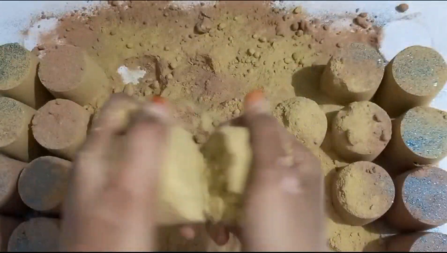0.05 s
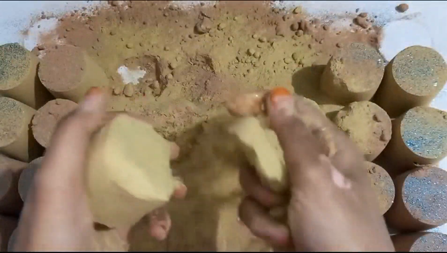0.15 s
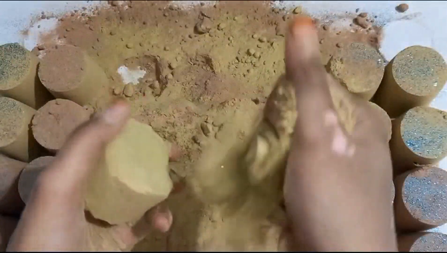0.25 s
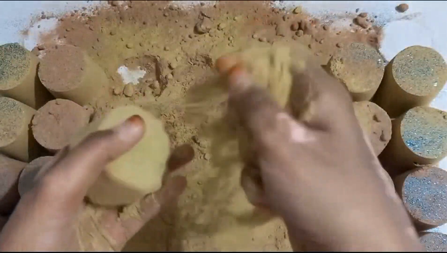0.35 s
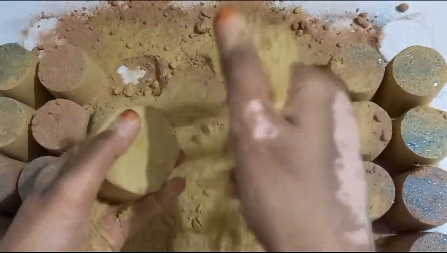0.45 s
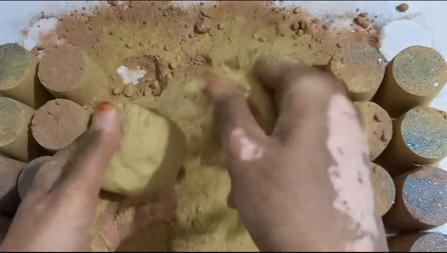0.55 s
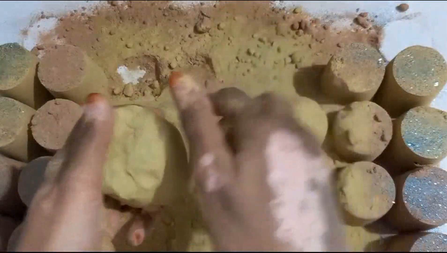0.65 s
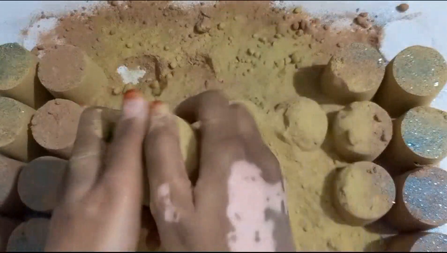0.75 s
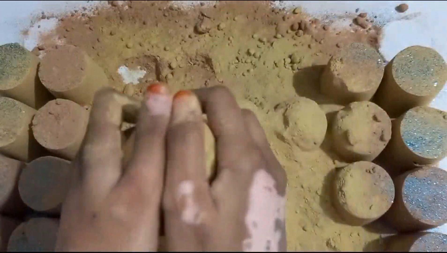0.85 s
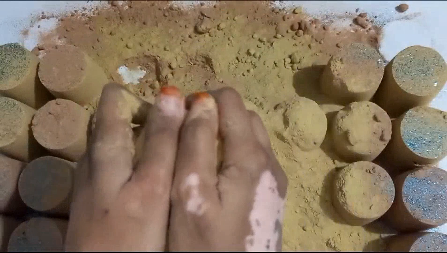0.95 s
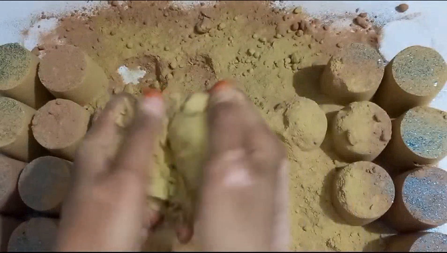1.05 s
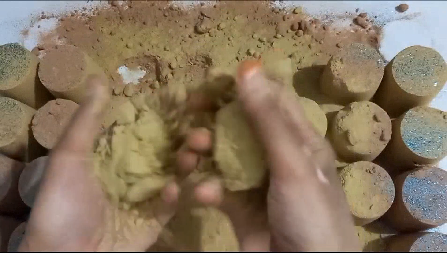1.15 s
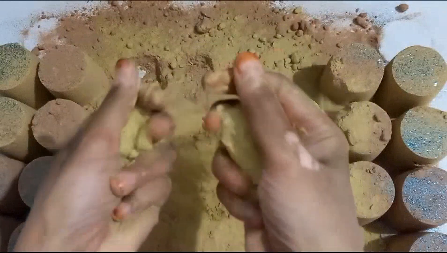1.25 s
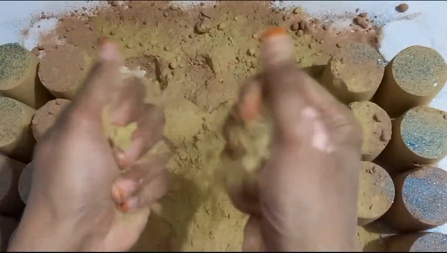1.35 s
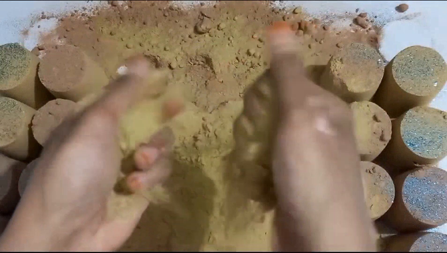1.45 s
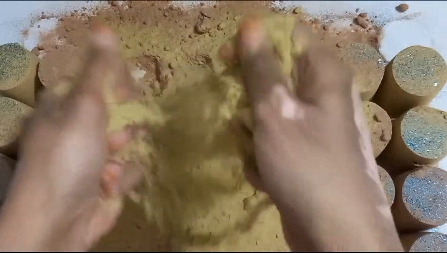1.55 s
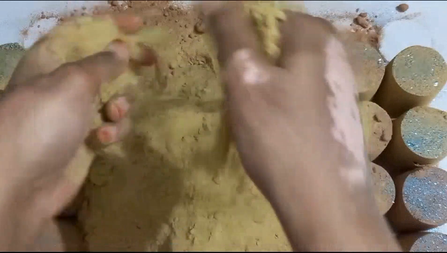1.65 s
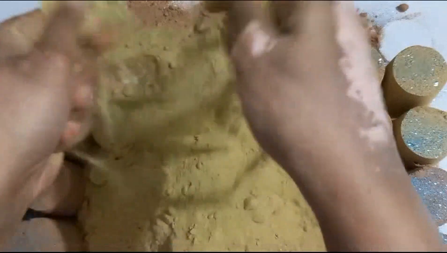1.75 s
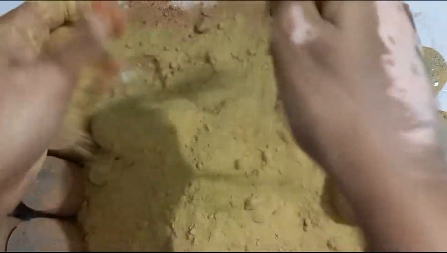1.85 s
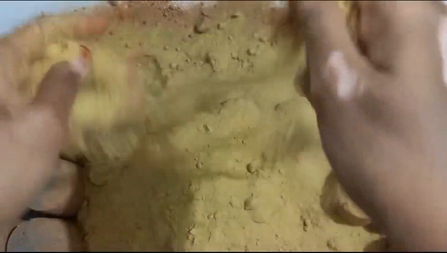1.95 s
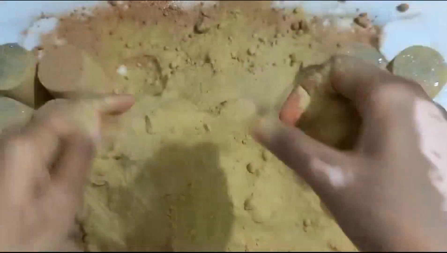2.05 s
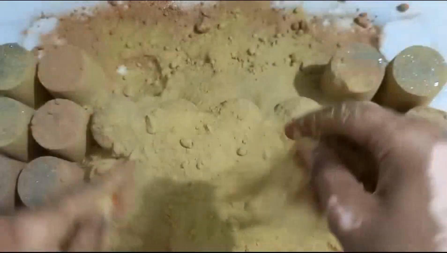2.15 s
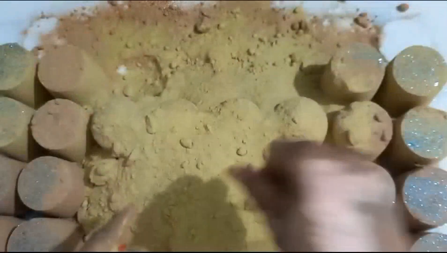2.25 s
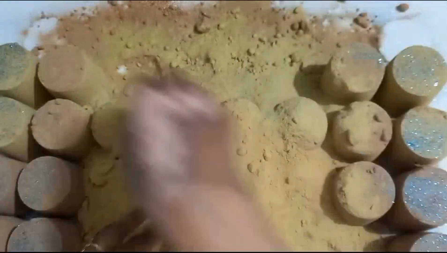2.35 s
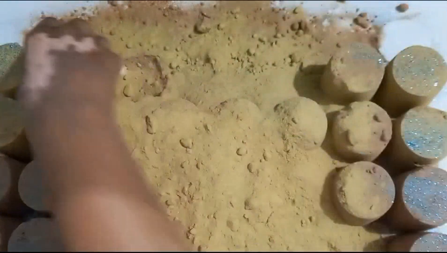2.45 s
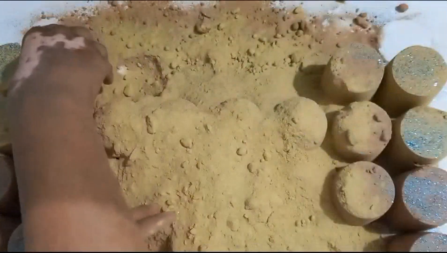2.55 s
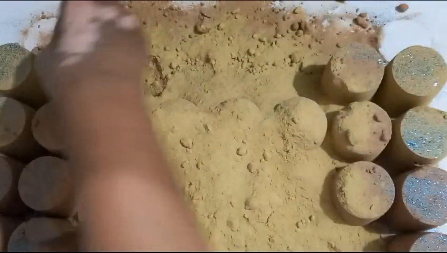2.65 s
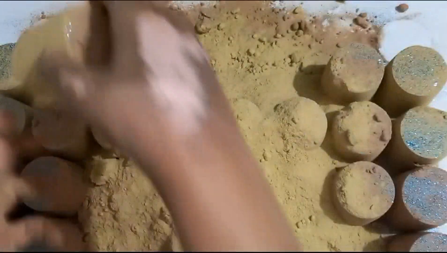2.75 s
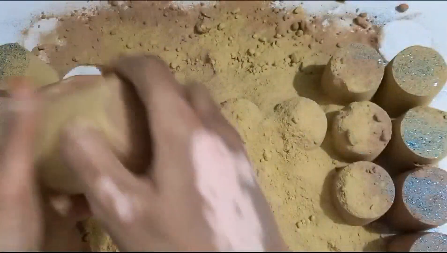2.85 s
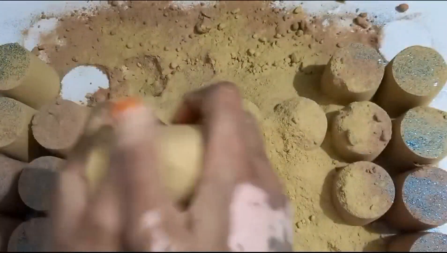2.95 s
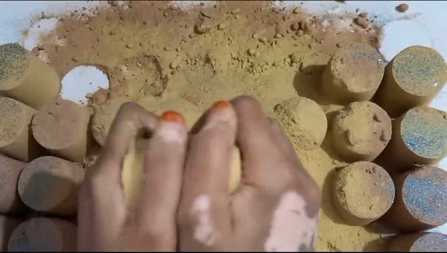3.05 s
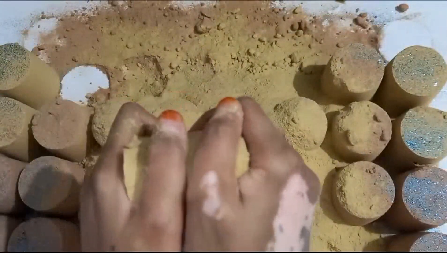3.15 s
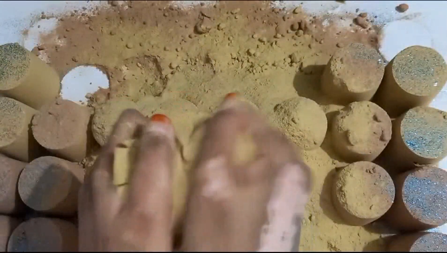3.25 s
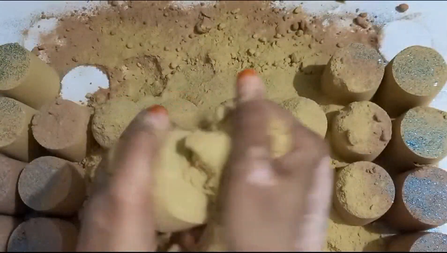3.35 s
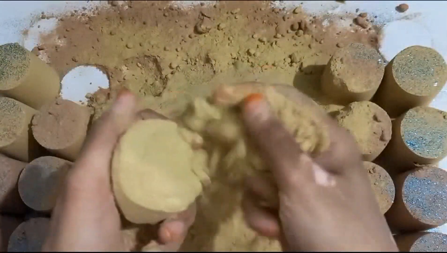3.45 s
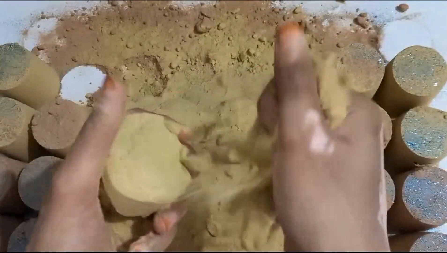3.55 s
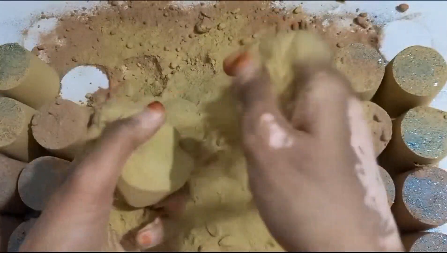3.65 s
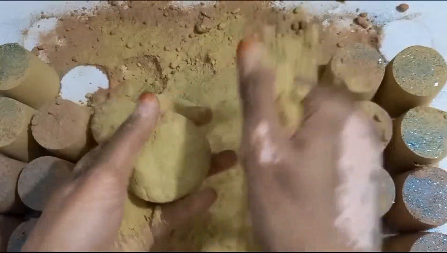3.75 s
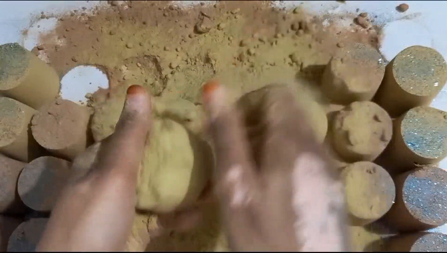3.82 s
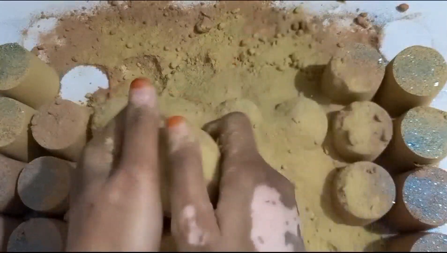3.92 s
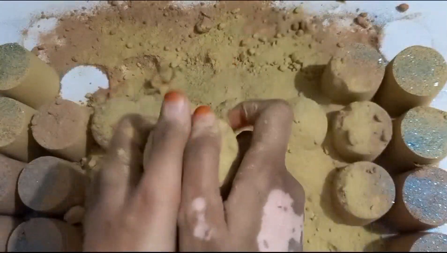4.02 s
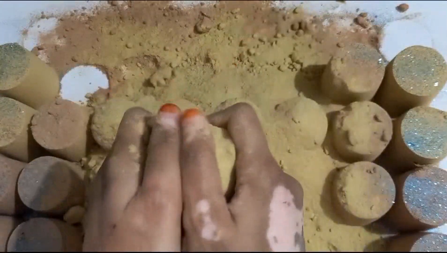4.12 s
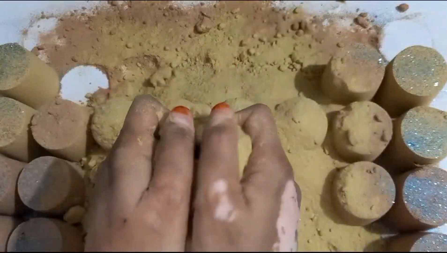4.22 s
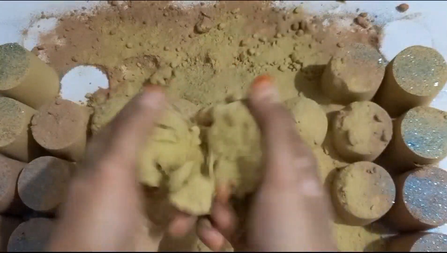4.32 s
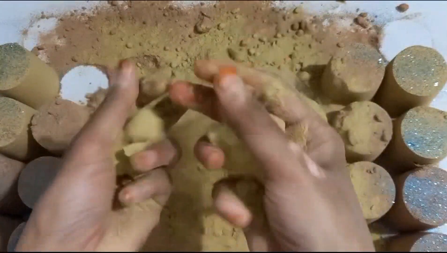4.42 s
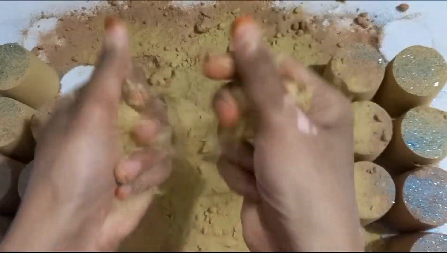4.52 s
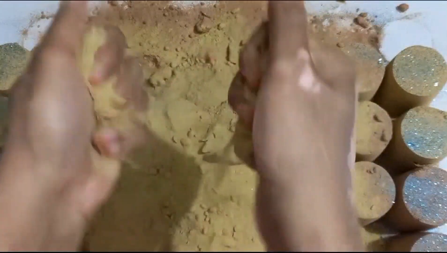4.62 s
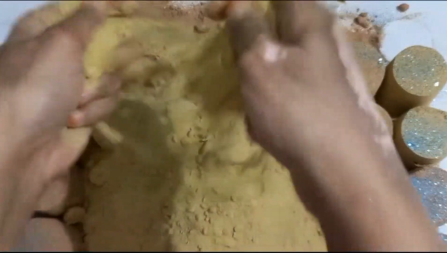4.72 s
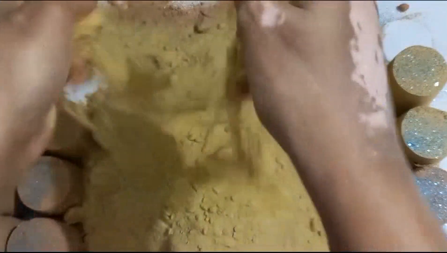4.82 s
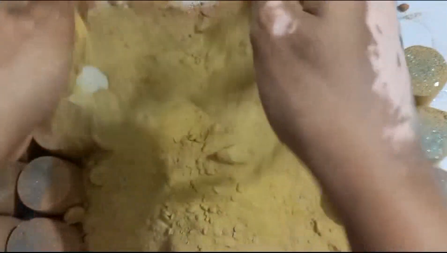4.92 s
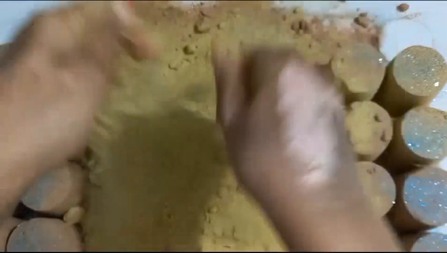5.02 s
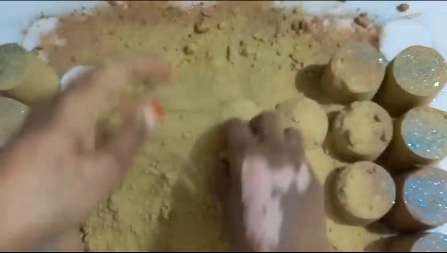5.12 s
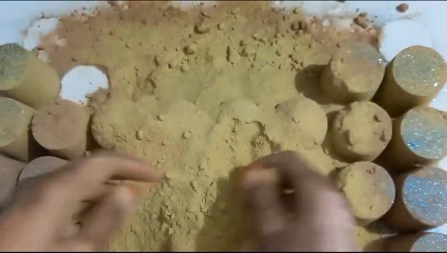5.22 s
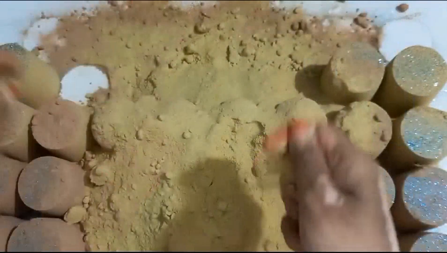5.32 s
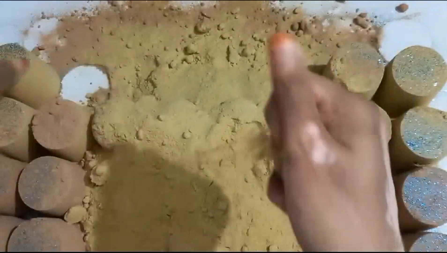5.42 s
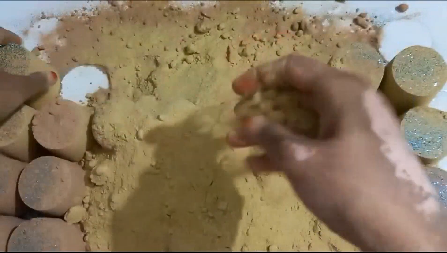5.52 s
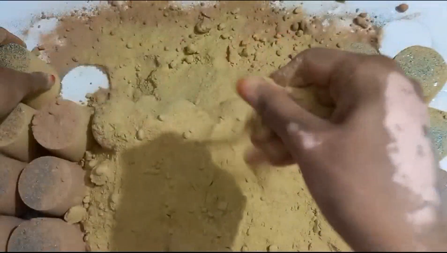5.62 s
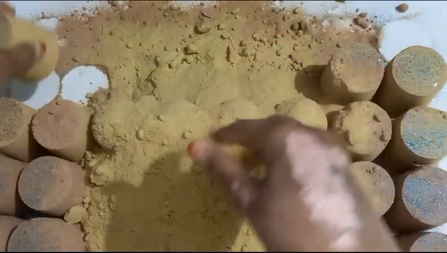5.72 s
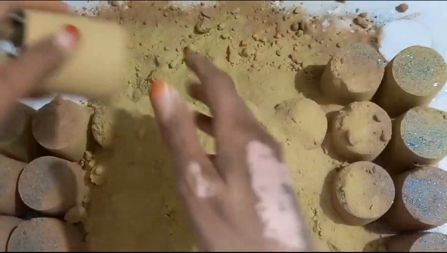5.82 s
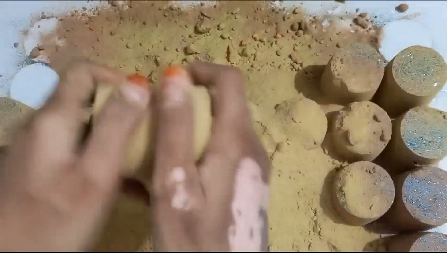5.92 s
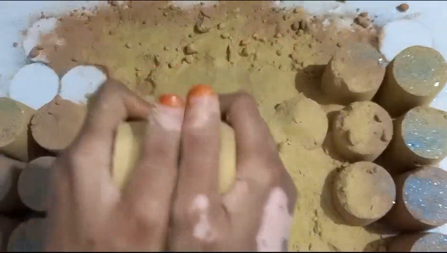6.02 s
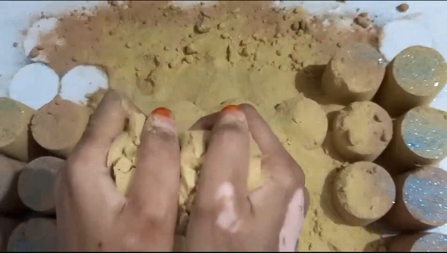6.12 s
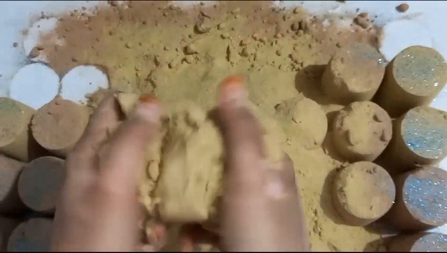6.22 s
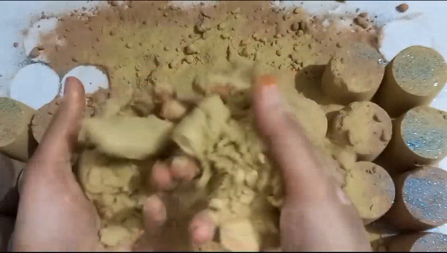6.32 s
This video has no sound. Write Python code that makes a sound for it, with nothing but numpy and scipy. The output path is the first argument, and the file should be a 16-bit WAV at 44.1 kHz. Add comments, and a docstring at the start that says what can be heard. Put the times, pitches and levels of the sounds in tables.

```python
"""Snapping and crumbling pressed powder

Two hands close by snap blocks of pressed powder and crumble the halves over a table in a small room.
Each fracture is a short low push and a burst of small cracks, coloured by the table and cupped hands.
Between them shaped noise grains rub and sift through the fingers as a hiss, and falling lumps knock.
A short room tail, a low rumble and a faint even hiss lie behind."""
import sys
import numpy as np
from scipy import signal
from scipy.fft import rfft, irfft, next_fast_len
from scipy.io import wavfile
from scipy.ndimage import map_coordinates

SR = 44100
rng = np.random.default_rng(int(sys.argv[2]) if len(sys.argv) > 2 else 0)


def persist_wave(psi):
    """Save psi, clipped to +-1, as 16-bit WAV."""
    counts = np.round(np.clip(psi, -1, 1) * 32767).astype(np.int16)
    wavfile.write(sys.argv[1], SR, np.atleast_2d(counts).T)


N = 280917

# Fractures and falling lumps: start_s, push_level_db, pitch_hz,
# crumble_re_push_db, crumble_t60_s, grit_re_push_db
BREAKS = [ (0.68, -48, 386, -4, .1, -4.5), (0.9601, -19, 222, -12.5, 0.071, -11),
          (0.9607, -18.5, 690, -18, .14, -14.5), (0.9672, -27.5, 327, 1.5, 0.065, 1),
          (1.002, -16.5, 790, -7, 0.049, -10.5), (1.336, -31, 660, -5.5, 0.17, -10),
          (1.5542, -28.5, 1250, 7, 0.017, -15.5), (1.5683, -18, 1310, -15.5, .08, -16),
          (1.7269, -15, 1110, -2, 0.047, -12), (1.728, -18.5, 620, -1, 0.064, -21),
          (1.8758, -30.5, 920, -1, 0.05, -13), (2.2541, -17, 1050, -2.5, .125, -15),
          (2.258, -20, 2300, -8.5, 0.093, -11.5), (2.286, -30.5, 800, -11, 0.083, -23.5),
          (2.2948, -29, 828, -3, 0.11, -14.5), (2.354, -33.5, 1414, -13, .047, -38.5),
          (3.2441, -10.5, 253, -11, 0.067, -10.5), (3.353, -36.5, 363, -6.5, .09, -15),
          (3.525, -40, 255, -7, 0.044, -23), (3.821, -39, 200, 1.5, 0.077, -5.5),
          (4.1761, -19, 206, -17, 0.13, -30), (4.188, -22, 336, -13, 0.11, -36.5),
          (4.484, -30, 2050, 0, 0.084, -3.5), (4.522, -25, 490, -6, .06, 2),
          (5.056, -44.5, 155, -6.5, 0.2, -20), (6.076, -34, 111, -12.5, .15, -5),
          (6.107, -33.5, 140, -12, 0.045, -7)]
# Resonances of the table and cupped hands: centre_hz, width_hz, relative_db
BODY_MODES = [(233, 30, -16.5), (344, 60, 0.5), (514, 17, -5.5), (722.2, 240, 1), (990, 37, 12),
              (2000, 230, 7), (2630, 110, 4.5)]
# Squeezes and strokes through the powder: hardest_s, tighten_s, relax_s, dust_flow_db, crumb_flow_db
SQUEEZES = [ (.023, 0.035, 0.03, -47, -53.5), (0.2, 0.054, 0.064, -38.5, -43.5),
            (.315, 0.027, .016, -53.5, -63), (0.397, 0.024, .07, -38.5, -46),
            (.565, .021, .044, -39, -54.5), (.756, .02, 0.029, -52, -73), (.836, 0.031, 0.021, -52, -86),
            (.96, 0.014, .02, -44, -50.5), (1.03, 0.025, .03, -51.5, -60.5),
            (1.115, 0.033, .018, -56.5, -68), (1.19, .014, .04, -44.5, -64),
            (1.255, 0.05, 0.12, -41, -45.5), (1.37, 0.071, .03, -35, -39.5),
            (1.455, 0.012, .018, -55, -57.5), (1.578, 0.041, .037, -34.5, -38.5),
            (1.774, 0.064, 0.039, -35.5, -39), (1.856, 0.036, 0.025, -42.5, -50),
            (1.958, 0.043, 0.047, -35.5, -47), (2.142, 0.023, 0.064, -42, -59), (2.19, .03, .06, -42, -50),
            (2.564, .038, .029, -60.5, -69), (2.774, 0.021, .018, -62.5, -87),
            (2.826, 0.014, .028, -49, -68), (2.898, .022, 0.045, -53.5, -74),
            (2.997, .055, 0.029, -49, -71), (3.126, 0.016, .04, -43, -50),
            (3.24, 0.022, 0.024, -42.5, -49.5), (3.315, 0.027, .045, -49.5, -51.5),
            (3.512, .044, .063, -38, -40), (3.625, 0.04, 0.038, -48, -57), (3.693, 0.022, .047, -36.5, -45),
            (3.818, 0.045, 0.022, -47.5, -50), (3.888, .027, 0.073, -47, -61),
            (4.089, .04, .035, -66.5, -81), (4.188, .014, 0.056, -45, -46.5), (4.307, .03, 0.051, -50, -68),
            (4.44, 0.032, 0.04, -43, -61.5), (4.491, 0.039, 0.033, -39, -40),
            (4.551, 0.043, 0.079, -36, -38.5), (4.757, .028, .062, -34.5, -40.5),
            (4.931, 0.053, 0.048, -36, -42.5), (5.041, 0.023, 0.013, -42, -48.5),
            (5.131, 0.026, .05, -64.5, -68), (5.25, .012, 0.0073, -54, -63),
            (5.299, .013, .022, -40, -40.5), (5.38, 0.063, .041, -41, -48.5),
            (5.607, 0.051, .038, -36.5, -63.5), (5.676, 0.016, .014, -55.5, -61),
            (5.845, 0.044, .026, -54, -85), (5.892, 0.0082, 0.018, -42.5, -79),
            (5.991, 0.072, 0.026, -47, -61), (6.082, 0.011, .044, -44.5, -40), (6.172, 0.09, .06, -54, -56),
            (6.33, 0.056, .05, -61, -66)]
# Skin squeaking on packed powder: middle_s, half_height_length_s, centre_hz, width_per_pass_hz, level_db
RUBS = [(.193, .12, 1170, 160, -50.5), (0.794, .07, 530, 80, -64.5), (1.224, .06, 1070, 90, -63),
        (1.825, .16, 520, 130, -49), (3.08, .07, 1410, 68, -67), (5.107, .13, 1070, 60.7, -61.5),
        (5.17, .032, 1270, 141, -57), (5.618, .05, 2380, 506, -46.5), (5.898, .06, 4370, 605, -47.5),
        (6.031, .08, 1044, 70, -60.5)]
# Spectrum of fine dust: frequency_hz, relative_db
DUST_SPECTRUM = [(500, -22.5), (1500, -27.5), (3000, -3.5), (4500, 3.5), (5600, 4), (6500, 5.5),
                 (9000, -18), (16000, -11)]
# Spectrum of the top hiss: frequency_hz, relative_db
FIZZ_SPECTRUM = [(5000, -34.5), (8000, 3.5), (10500, 0.5), (16000, -9.5)]
# Spectrum of coarse crumbs: frequency_hz, relative_db
CRUMB_SPECTRUM = [(200, -18.5), (500, -18.5), (850, -15), (1150, 0), (1600, -4), (2200, 1), (3200, -5.5),
                  (5000, -9), (12000, -46.5)]
# Spectrum of soft clods: frequency_hz, relative_db
CLOD_SPECTRUM = [(40, -20.5), (100, 7), (250, -6.5), (500, 0.5), (800, -6.5), (3000, -48)]
# Spectrum of fracture grit and single crumbs: frequency_hz, relative_db
GRIT_SPECTRUM = [(150, -26.5), (700, 1), (2300, -0.5), (4500, -1), (6500, -4.5), (9000, -9.5),
                 (16000, -22.5)]
# Decay of the room tail: frequency_hz, t60_s
ROOM_DECAY = [(150, 0.11), (1000, 0.13), (4000, 0.17), (12000, 0.064)]
# Low rumble of the table and room: time_s, relative_db
RUMBLE_LEVEL = [(0.0, -73.5), (0.83, -70), (1.7, -73.5), (1.86, -62), (2.68, -75.5), (3.14, -70),
                (3.28, -66.5), (3.65, -59), (3.89, -70), (4.72, -68.5), (4.98, -72), (5.64, -67.5),
                (6.25, -70), (6.37, -60)]
# Spectrum of the rumble: frequency_hz, relative_db
RUMBLE_SPECTRUM = [(20, -24), (45, -13.5), (90, 3), (160, -11), (400, -26.5), (1500, -56.5)]
# Spectrum of the faint hiss: frequency_hz, relative_db
AIR_SPECTRUM = [(100, 4.5), (400, 0), (1200, -9.5), (3000, -19.5), (16000, -10)]
# Left-right likeness: frequency_hz, correlation [-1 to 1]
STEREO_LIKENESS = [(60, 0.61), (200, 0.34), (700, 0.12), (1500, 0.29), (3000, 0.084), (6500, 0.75),
                   (15000, .55)]
# Overall tone: frequency_hz, gain_db
OVERALL_TONE = [(20, 1.5), (5900, 2), (6500, 5), (7000, 0.5), (7600, -10.5), (8500, -24), (9600, -16.5),
                (13500, -13), (15000, 6), (16000, 3.5)]

LEFT_LEAD_S = 0.00015
BAND_LIMIT_HZ = 15900
CLODS_RE_CRUMB_FLOW_DB = -13.5
TIGHTEN_POWER, RELAX_POWER = 1.71, 1.52  # 1 = pointed swell, 2 = rounded with a steep foot
FIRM_DUST_DB = -37.5  # dust flow in a firm squeeze
FIZZ_AT_FIRM_DB, FIZZ_DB_PER_DUST_DB = -39, 1.96
TRICKLE_RE_PEAK_DB, TRICKLE_FADE_S = -19, 0.035


def breaks():
    """Thick blocks part with a low thud, thin pieces and falling lumps with a higher crack."""
    out = np.zeros((2, N + SR))
    for start_s, push_db, pitch_hz, crumble_db, t60_s, grit_db in BREAKS:
        sound = amp(push_db) * fracture(pitch_hz, crumble_db, t60_s, grit_db)
        start = round(start_s * SR)
        out[:, start:start + sound.shape[1]] += sound
    return out[:, :N]


def fracture(pitch_hz, crumble_db, t60_s, grit_db):
    """A push of about two cycles, then small cracks that spread through the block and shake the table."""
    push_cycles, spread_cycles = 0.26, 0.55
    least_width_hz, ring_db, low_cut_ratio = 220, -1, 0.42
    t_s = np.arange(SR // 3) / SR
    u = t_s * pitch_hz / push_cycles
    swell = (u / 2) ** 2 * np.exp(2 - u)  # peaks at 1
    push = -np.sin(2 * np.pi * pitch_hz * t_s) * swell

    # Cracks take longer to cross a thick, low-pitched block.
    onset = 1 - np.exp(-t_s * pitch_hz / spread_cycles)
    dying = onset * amp(-60 * t_s / t60_s)

    def crumble_response(f):
        """Block pitch, weak bass radiation of small pieces, then table and hands."""
        narrow = resonance(f, pitch_hz, least_width_hz + pitch_hz)
        broad = resonance(f, pitch_hz, 2.5 * pitch_hz)
        radiation = (1j * f / (1j * f + low_cut_ratio * pitch_hz)) ** 2
        modes = sum(amp(db) * resonance(f, hz, width_hz) for hz, width_hz, db in BODY_MODES)
        return narrow * broad * radiation * (1 + amp(ring_db) * modes)

    crumble = ports(grains(len(t_s), rate_hz=2500, spread_db=2.5), crumble_response)
    grit = shaped(rng.standard_normal((2, len(t_s))), GRIT_SPECTRUM)
    return push + dying * (amp(crumble_db) * crumble + amp(grit_db) * grit)


def powder():
    """Squeezing shears dust, cracks crumbs and presses on the heap; dust and crumbs flow in small clumps."""
    slips = grains(N, rate_hz=9000, spread_db=3)
    sparks = grains(N, rate_hz=12000, spread_db=1.5)
    clumps_db = 1.1 * wobble(70)
    dust_flow_db, crumb_flow_db = squeezing()

    dust_db = dust_flow_db + clumps_db + wobble(160) - 2.06
    dust = hollows(shaped(slips, DUST_SPECTRUM), depth_db=3, width_hz=362.3, life_s=0.034)

    # The top hiss rises and falls more steeply than the dust.
    fizz_db = FIZZ_AT_FIRM_DB + FIZZ_DB_PER_DUST_DB * (dust_flow_db - FIRM_DUST_DB)
    fizz_db = fizz_db + clumps_db + 4.2 * wobble(27)
    fizz = shaped(sparks, FIZZ_SPECTRUM)

    crumbs = shaped(grains(N, rate_hz=3000, spread_db=0), CRUMB_SPECTRUM)
    crumbs = hollows(crumbs, depth_db=6.5, width_hz=192, life_s=0.039)
    crumbs_db = crumb_flow_db + clumps_db + 1.7 * wobble(110)

    # Single crumbs give way.
    snaps = shaped(grains(N, rate_hz=150, spread_db=0), GRIT_SPECTRUM)

    # Soft clods land on the heap.
    clods = shaped(grains(N, rate_hz=3000, spread_db=-1.0), CLOD_SPECTRUM)
    clods = hollows(clods, depth_db=8.0, width_hz=110, life_s=0.071)

    left_heavy = amp([[1.8], [-1.8]])
    fine = (amp(dust_db) * dust + amp(fizz_db) * fizz) * left_heavy
    coarse = amp(crumbs_db) * crumbs + amp(crumb_flow_db - 10.0) * snaps
    return fine + coarse + amp(crumb_flow_db + CLODS_RE_CRUMB_FLOW_DB) * clods


def squeezing():
    """Dust and crumb flow in dB: swells as the grip tightens, fades as it relaxes, over a faint trickle."""
    t_s = np.arange(N) / SR
    power = np.full((2, N), 1e-10)
    for hardest_s, tighten_s, relax_s, dust_db, crumbs_db in SQUEEZES:
        near = abs(t_s - hardest_s) < 0.5
        late_s = t_s[near] - hardest_s
        tighten = abs(late_s / tighten_s) ** TIGHTEN_POWER
        relax = abs(late_s / relax_s) ** RELAX_POWER
        grip = np.exp(-np.where(late_s < 0, tighten, relax))
        # Loose grains keep shifting around each squeeze.
        trickle = amp(TRICKLE_RE_PEAK_DB) * np.exp(-abs(late_s) / TRICKLE_FADE_S)
        power[:, near] += amp([[dust_db], [crumbs_db]]) ** 2 * (grip ** 2 + trickle ** 2)
    return 10 * np.log10(power)


def hollows(x, depth_db, width_hz, life_s):
    """The gaps between moving fingers lift and cut narrow bands, which come and go."""
    hz, t_s, z = signal.stft(x, SR, nperseg=1024)
    where = np.meshgrid(hz / width_hz, t_s / life_s, indexing="ij")
    field = map_coordinates(rng.standard_normal((256, 256)), where, mode="wrap", order=2)
    varied = signal.istft(z * amp(depth_db * field), SR, nperseg=1024)[1]
    return unit(varied[:, :N])


def rubs():
    """Each slip swells and fades, sounding one band of the grains under the finger."""
    out = np.zeros((2, N + SR))
    for middle_s, length_s, hz, width_hz, level_db in RUBS:
        n = round(2 * length_s * SR)
        slips = grains(n, rate_hz=6700, spread_db=-1.5)
        band = ports(slips, lambda f: resonance(f, hz, width_hz) ** 2)
        start = round((middle_s - length_s) * SR)
        out[:, start:start + n] += amp(level_db) * np.hanning(n) * band
    return out[:, :N]


def room(x, delay_s=0.0087):
    """Near walls answer with a short tail, a different one at each port."""
    hz, t_s, z = signal.stft(rng.standard_normal((2, SR // 3)), SR, nperseg=256)
    decay = amp(-60 * t_s / along(ROOM_DECAY, hz)[:, None])
    tail = signal.istft(z * decay, SR, nperseg=256)[1]
    tail = tail / np.linalg.norm(tail[0])
    tail = np.pad(tail, ((0, 0), (round(delay_s * SR), 0)))
    return signal.fftconvolve(x, tail, axes=1)[:, :N]


def background():
    """An uneven low rumble and a faint, even hiss, both shaped noise."""
    path_db = np.interp(np.arange(N) / SR, *np.transpose(RUMBLE_LEVEL))
    rumble_db = path_db + 3 * wobble(12) + 3.5
    rumble = amp(rumble_db) * shaped(rng.standard_normal((2, N)), RUMBLE_SPECTRUM)
    hiss = amp(-69) * shaped(rng.standard_normal((2, N)), AIR_SPECTRUM)
    return rumble + hiss


def grains(n, rate_hz, spread_db):
    """Two trains of tiny slips at random times and of random size, rms 1."""
    struck = rng.random((2, n)) < rate_hz / SR
    size = rng.standard_normal((2, n)) * amp(spread_db * rng.standard_normal((2, n)))
    return unit(struck * size)


def shaped(pair, spectrum):
    """Stereo sound with the given (frequency_hz, relative_db) spectrum, rms 1."""
    return ports(pair, lambda f: amp(along(spectrum, f)))


def ports(pair, colour):
    """Two unrelated signals become a coloured, partly alike stereo pair of rms 1."""
    def mid_side(f):
        turn = np.arccos(np.clip(along(STEREO_LIKENESS, f), -1, 1)) / 2
        return colour(f) * np.array([np.cos(turn), np.sin(turn)])

    def lead(f):
        # The left port leads, by at most one full turn of phase.
        return np.exp(1j * np.pi * np.outer([1, -1], np.minimum(LEFT_LEAD_S * f, 1)))

    mid, side = filtered(pair, mid_side)
    return unit(filtered(np.array([mid + side, mid - side]), lead))


def resonance(f, centre_hz, width_hz):
    """Causal response of one mode, gain 1 at its centre."""
    return 1j * f * width_hz / (centre_hz ** 2 - f ** 2 + 1j * f * width_hz)


def filtered(x, response):
    """x times a complex response of frequency."""
    n = x.shape[-1]
    m = next_fast_len(n + SR // 4)
    return irfft(rfft(x, m) * response(np.fft.rfftfreq(m, 1 / SR)), m)[..., :n]


def wobble(rate_hz):
    """A smooth random curve with rate_hz knots a second."""
    knots = rng.standard_normal(int(N * rate_hz / SR) + 4)
    return map_coordinates(knots, [np.arange(N) * rate_hz / SR])


def along(points, hz):
    """Interpolate (frequency_hz, value) points on a log frequency axis."""
    f, v = np.transpose(points)
    return np.interp(np.log(hz + 1), np.log(f + 1), v)


def unit(x):
    """x at rms 1."""
    return x / np.sqrt(np.mean(x ** 2) + 1e-20)


def amp(db):
    """Decibels to gain."""
    return 10 ** (np.asarray(db) / 20)


def scene():
    """Hands and powder close by, in a quiet room."""
    cracks = breaks()
    rustle = powder() + rubs()
    reverb = room(amp(-14.0) * cracks + amp(-20.5) * rustle)
    return cracks + rustle + reverb + background()


def record(dry):
    """The overall tone peaks near 6.5 and 15 kHz, is dull between, and stops at the band limit."""
    coloured = filtered(dry, lambda f: amp(along(OVERALL_TONE, f)))
    return filtered(coloured, lambda f: f < BAND_LIMIT_HZ)


dry = scene()
out = record(dry)
persist_wave(out)
```